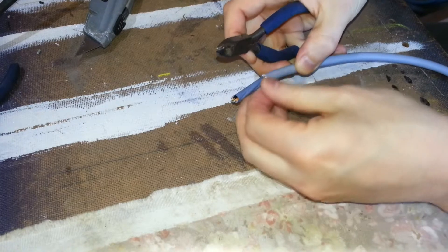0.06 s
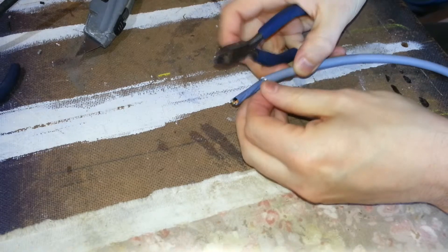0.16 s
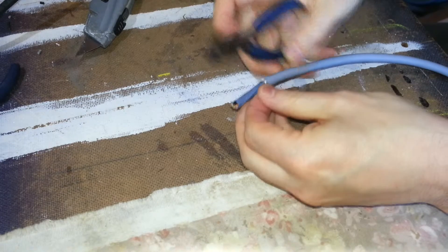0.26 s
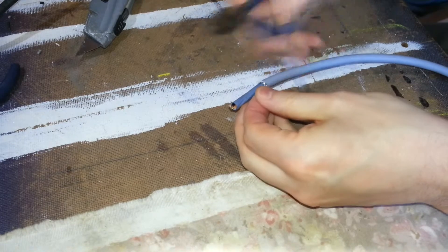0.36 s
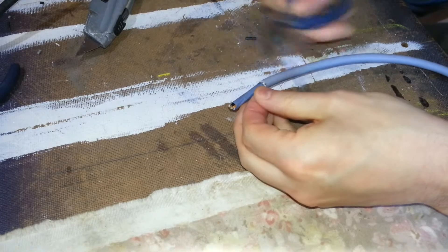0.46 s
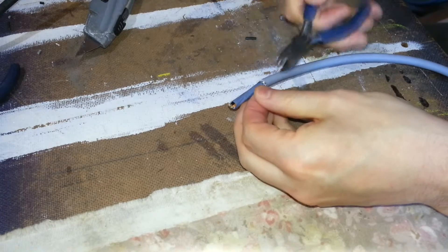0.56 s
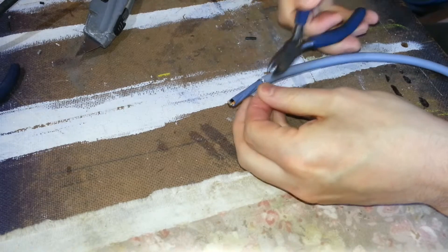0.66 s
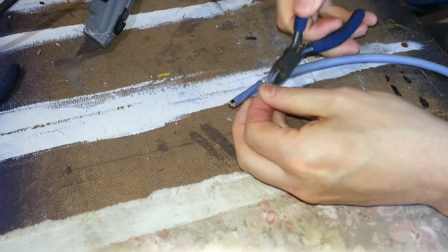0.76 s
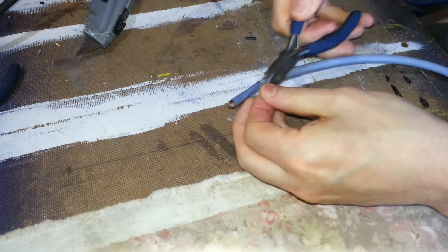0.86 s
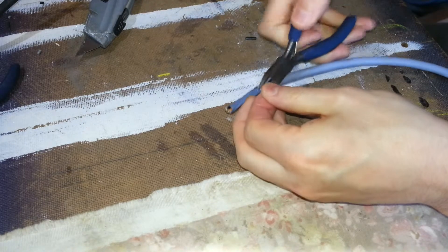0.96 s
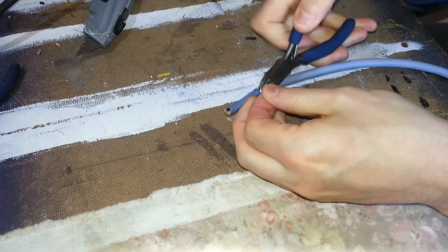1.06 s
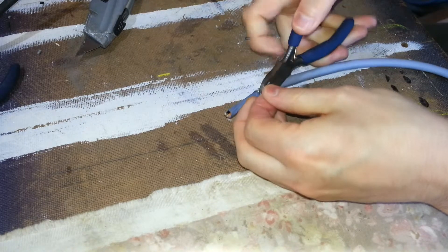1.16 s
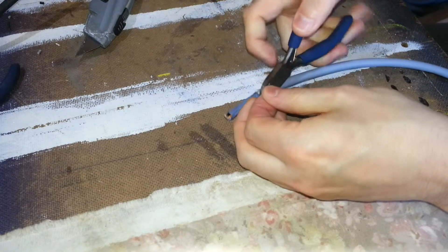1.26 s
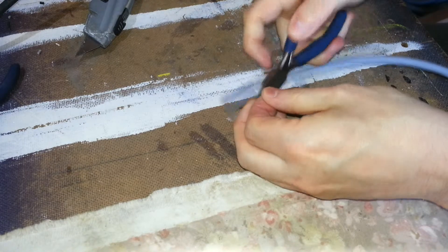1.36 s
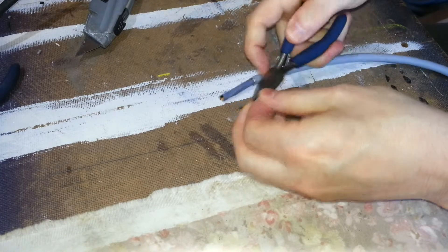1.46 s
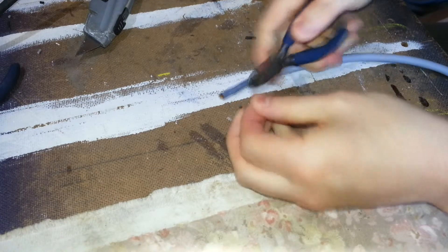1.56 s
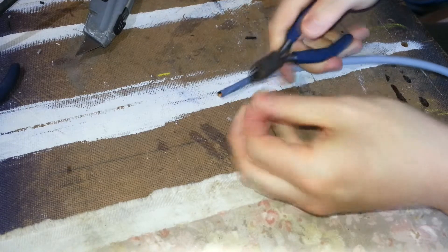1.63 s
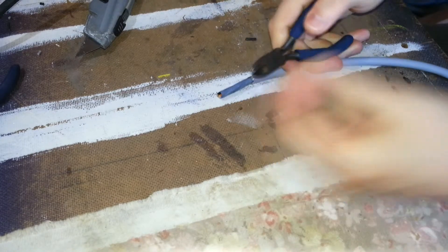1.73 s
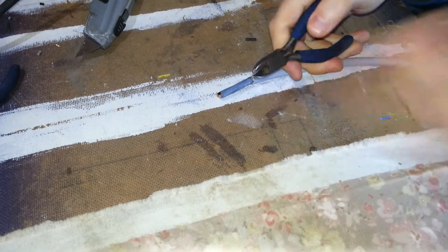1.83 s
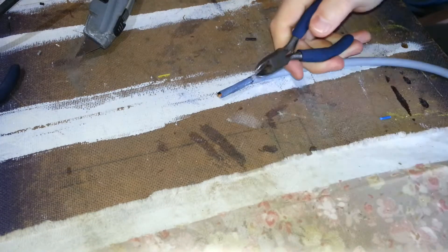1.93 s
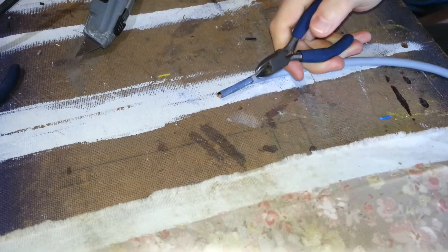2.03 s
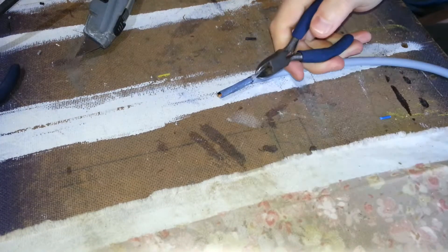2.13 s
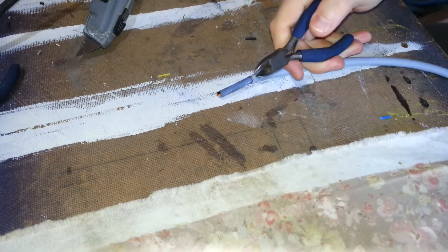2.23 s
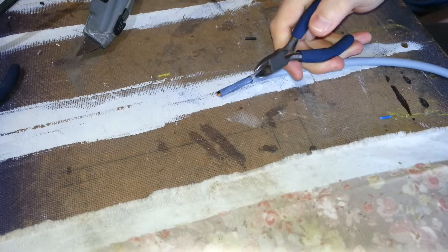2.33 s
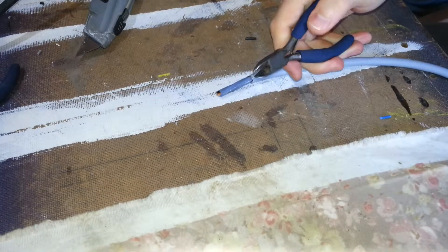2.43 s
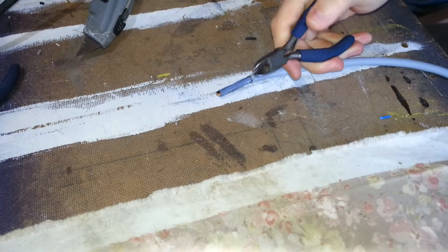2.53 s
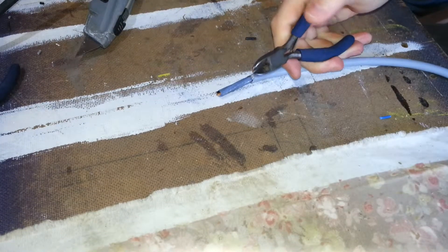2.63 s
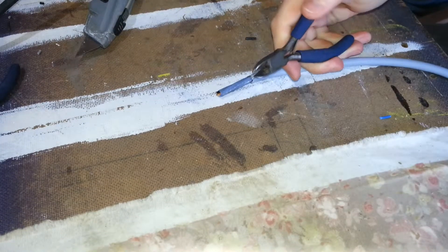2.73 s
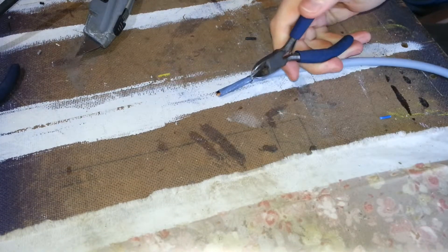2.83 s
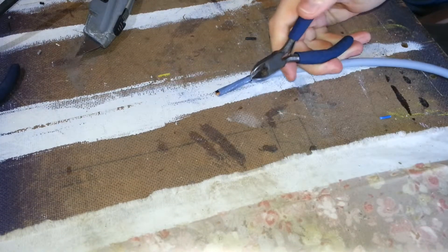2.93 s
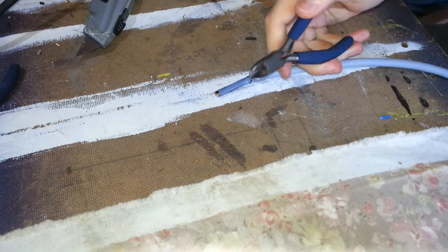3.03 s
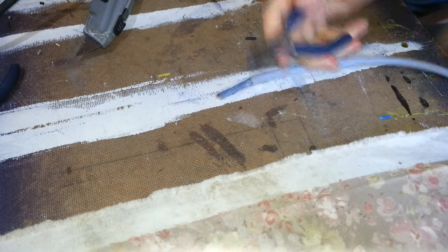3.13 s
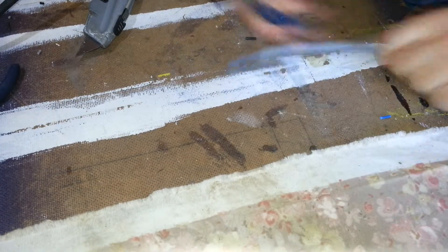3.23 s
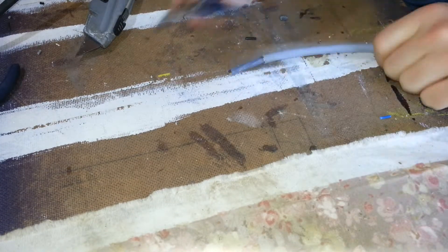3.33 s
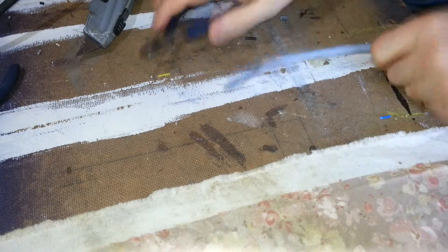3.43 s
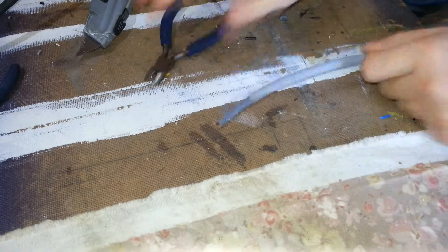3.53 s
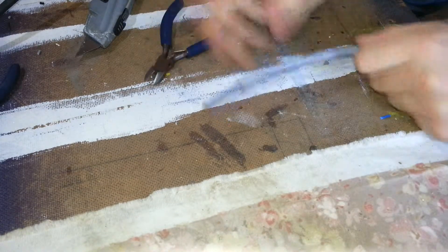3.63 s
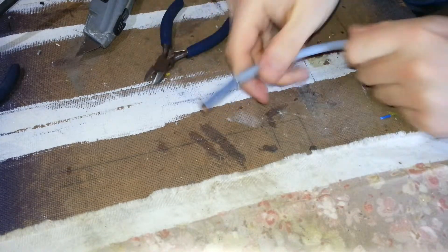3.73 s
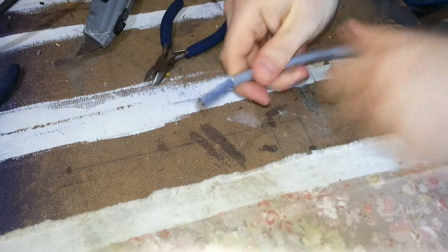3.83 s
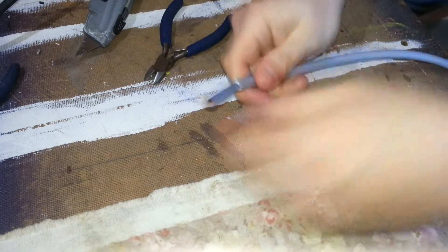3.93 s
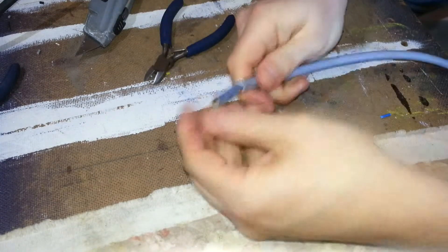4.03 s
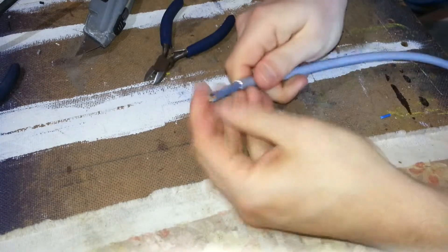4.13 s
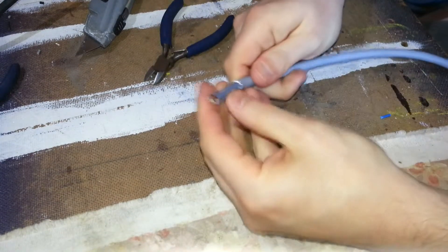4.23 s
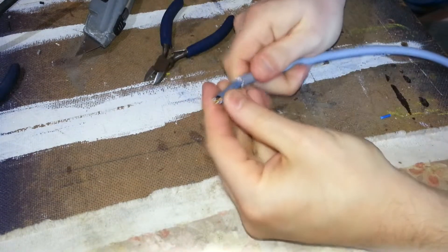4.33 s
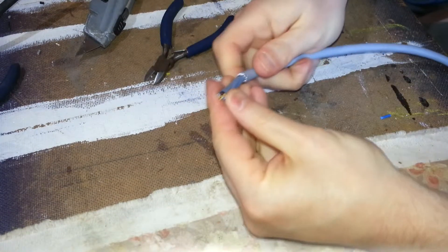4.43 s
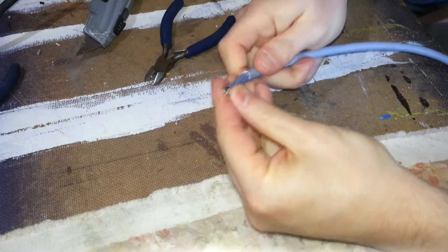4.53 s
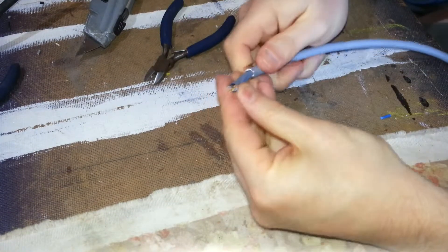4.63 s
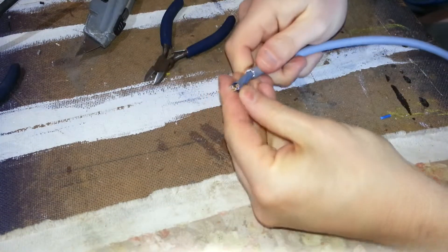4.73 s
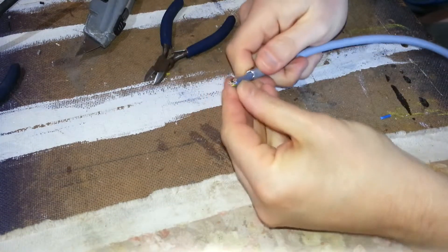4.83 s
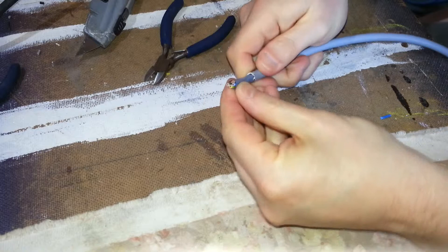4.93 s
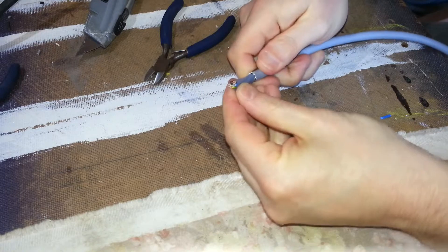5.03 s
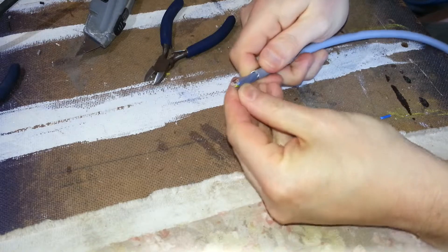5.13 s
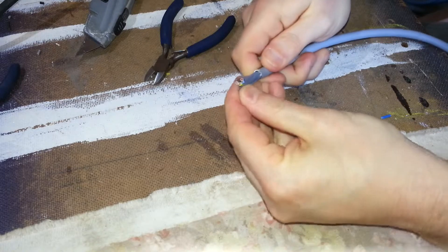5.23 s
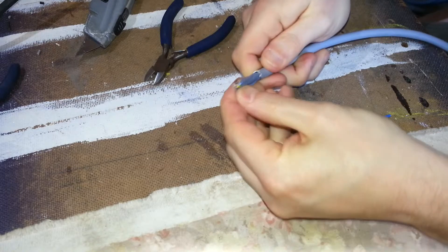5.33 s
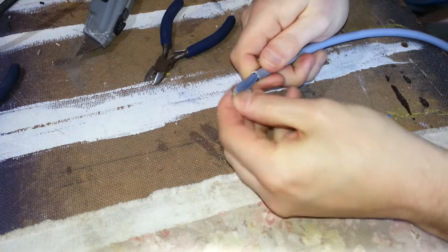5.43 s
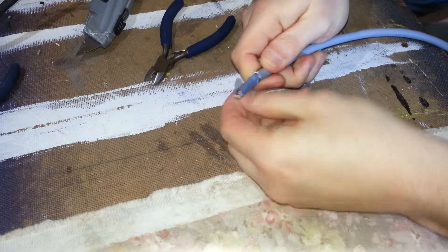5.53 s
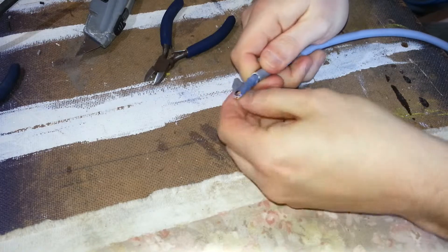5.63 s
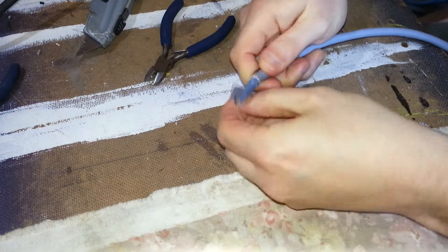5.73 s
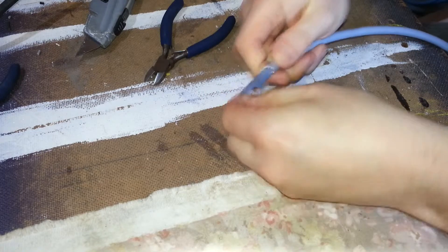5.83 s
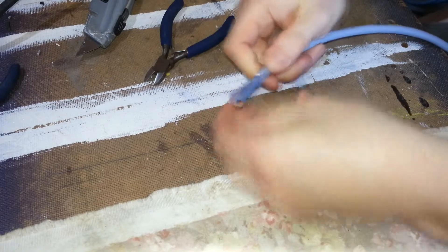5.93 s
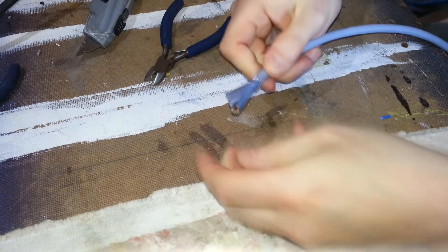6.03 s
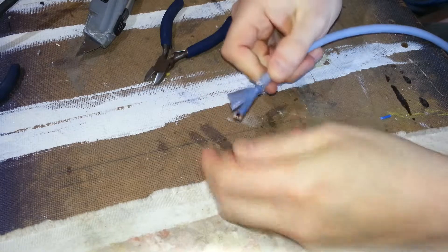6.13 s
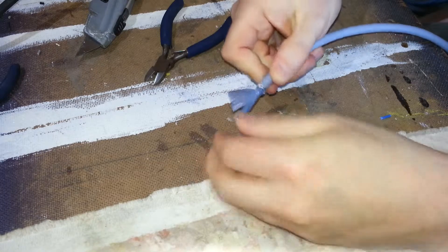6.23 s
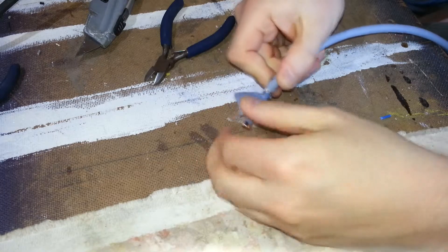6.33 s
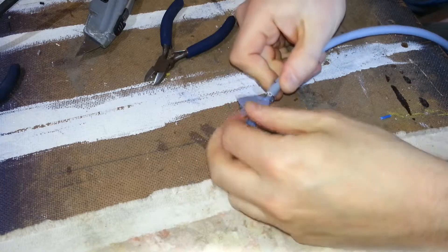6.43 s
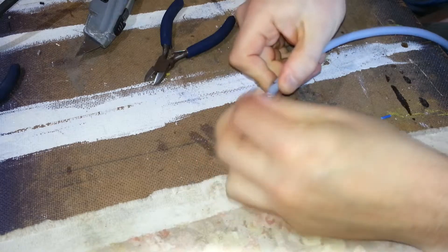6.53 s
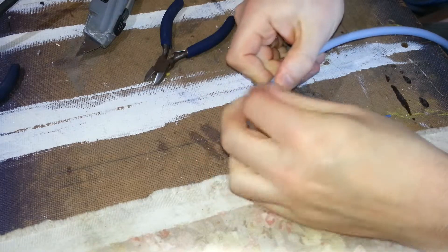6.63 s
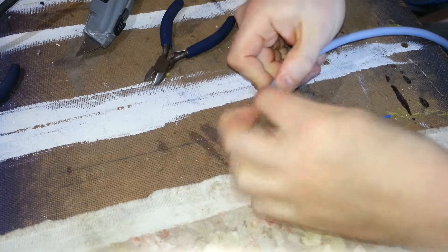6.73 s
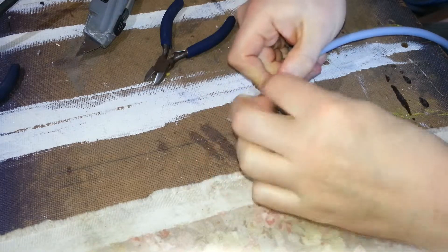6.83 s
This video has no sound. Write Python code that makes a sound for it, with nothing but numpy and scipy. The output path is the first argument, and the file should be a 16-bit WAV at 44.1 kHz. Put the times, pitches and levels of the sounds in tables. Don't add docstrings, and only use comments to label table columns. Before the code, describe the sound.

Side cutters knock softly, then clack hard onto a wooden workbench; fingers then pick and peel crackling foil from a cable end, close up in a small room.

```python
import sys
import numpy as np
from scipy import signal
from scipy.fft import rfft, irfft
from scipy.io import wavfile
from scipy.ndimage import uniform_filter1d

SR = 44100
rng = np.random.default_rng(int(sys.argv[2]) if len(sys.argv) > 2 else 0)


def int16_out(signal):
    q = np.round(np.clip(np.atleast_2d(signal).T, -1, 1) * 32767)
    wavfile.write(sys.argv[1], SR, q.astype(np.int16))


def ratio(d):
    e = np.asarray(d, float) / 20
    return 10 ** e


N = 302878

# frequency in Hz, level in dB, t60 in s.
BENCH_MODES = [(236, 1.5, 0.038), (309, -3, 0.2), (383.4, -6, 0.17), (434, 0, 0.056), (492.5, -8, 0.098),
               (537, -0.5, 0.096), (650, -0.5, 0.16), (805, -9, 0.25), (958, -11, .09), (1009, 5, 0.12),
               (1110, -9, 0.033), (1142, 6, 0.059), (1260, 11, 0.056), (1365, -5, 0.072),
               (1773, -5.5, 0.14), (1898, -4, 0.053), (2166, -2, 0.05)]
LEFT_LAG = 2


def unit(x):
    return x / np.sqrt(np.mean(x ** 2))


def shape(x, table):
    hz, db = np.transpose(table)
    f = np.fft.rfftfreq(x.shape[-1], 1 / SR) + 1
    return irfft(rfft(x) * ratio(np.interp(np.log(f), np.log(hz), db)), x.shape[-1])


def band(x, lo_hz, hi_hz):
    return signal.sosfilt(signal.butter(2, [lo_hz, min(hi_hz, .45 * SR)], "band", fs=SR, output="sos"), x)


def ring(hz, t60, t, phase=0):
    return np.sin(2 * np.pi * hz * t + phase) * 1000. ** (-t / t60)


def grains(per_s, spread_db):
    hit, size, sign = rng.random(N), rng.exponential(size=N), rng.standard_normal(N)
    return (hit < per_s / SR) * ratio(spread_db * np.minimum(size, 4.5)) * np.sign(sign)


def strokes(rows):
    t = np.arange(N) / SR
    return sum(ratio(db - 30 * np.maximum((s - t) / rise, (t - s) / fall)) for s, db, rise, fall in rows)


def add(out, s, x, db, pan_db=0, lag=0):
    i = int(s * SR)
    x = (x * ratio(db + np.array([[pan_db], [-pan_db]]) / 2))[:, :N - i - lag]
    out[0, i + lag:i + lag + x.shape[1]] += x[0]
    out[1, i:i + x.shape[1]] += x[1]


def knocks():
    # time in s, peak in dB, contact ring in Hz, ring rise in ms,
    # thud relative to the blow in dB.
    blows = [(.871, -43, 520, 1.6, 2.5), (1.3935, -14.5, 1690, 0.4, -11), (1.3962, -13.5, 1280, 1.76, -14),
             (1.393, -25, 309, 15, -24), (1.569, -45, 328, 5.7, -11), (1.592, -44, 318, 4, -7),
             (1.669, -46.5, 1110, 0.87, 5), (3.101, -43.5, 1370, 2.7, 3.5), (2.1265, -36.5, 370, 2.6, -23),
             (2.152, -35.5, 225, 3.3, -4), (3.118, -44, 1287, 0.82, 1), (3.2432, -24.5, 970, 2.6, -28),
             (3.244, -22.5, 472, 0.74, -13.5), (3.245, -24, 384, 5.3, -25), (3.305, -30, 910, 0.71, -5.5),
             (3.4325, -19.5, 1106, 1.3, -12), (3.5003, -4.5, 1050, 1.84, -10.5),
             (3.5172, 8, 1073, 0.8, -6.5), (3.5215, 0, 780, 0.95, -1.5), (3.5245, 3.5, 1300, 1.3, -22),
             (3.531, -16, 575, 4.7, -19), (3.6365, -14, 680, 1.5, -6.5), (3.644, -20, 1060, 1.9, 5),
             (3.572, -22, 396, 2.2, -18), (3.585, -32, 272, 1.7, -12), (5.532, -37.5, 565.7, 1.8, 9),
             (6.182, -42, 310, 0.816, 3), (6.199, -39, 566, 0.71, 0), (3.518, -12, 309, 12.3, -18),
             (3.518, -6.5, 248, 3.9, -14), (3.519, -10, 2397, 1.0, -8), (3.52, -19, 147, 22, -30),
             (1.393, -32.5, 359, 12, -24), (1.398, -31, 710, 7, -14), (1.3945, -32, 3000, 1.3, -16),
             (3.403, -32, 260, 2.4, -3), (3.446, -30, 1220, 1.6, -16), (3.245, -44, 224, 21, -30),
             (3.552, -29, 1114, 8.3, -11), (3.585, -19, 1110, 3.3, -17)]
    # frequency in Hz, level in dB per Hz.
    crack_colour = [(1300, -24.5), (2000, 4), (2900, 3.5), (4000, -7), (6000, -22.5), (9000, -30),
                    (16000, -50.5)]
    crack_1ms_db, crack_db_per_octave = -5.5, -8

    out, t = np.zeros((2, N)), np.arange(SR // 4) / SR
    hz, db, t60 = np.array(BENCH_MODES).T[:, :, None]
    mix = rng.standard_normal((len(blows), len(BENCH_MODES), 3))
    noise = rng.standard_normal((len(blows), 2, len(t)))
    ear = np.array([1, -1])[:, None]
    crack_decay = 1000. ** (-t / 0.032) + ratio(-11.0) * 1000. ** (-t / 0.14)
    for k, (s, peak_db, ring_hz, rise_ms, thud_db) in enumerate(blows):
        crack_db = thud_db + crack_1ms_db + crack_db_per_octave * np.log2(rise_ms)
        high_db = 0.43 * thud_db - 4.0 - 3 * np.abs(np.log2(hz / ring_hz))
        share_db = np.where(hz < 500, thud_db + 2.0, high_db)
        skew = ear[:, None] * mix[k, :, 2:] * np.minimum(hz / 1200, 1.3)
        detuned_hz = hz * (1 + .012 * mix[k, :, 1:2])
        modes = ratio(db + share_db + 2.5 * mix[k, :, :1]) * ring(detuned_hz, .5 * t60, t, skew)
        boards = ratio(-7.0) * modes.sum(1) * (1 - np.exp(-t / 0.0018))
        u = t / (rise_ms / 1000)
        contact = -np.sin(2 * np.pi * ring_hz * (t + ear * 7e-5)) * u * np.exp(.5 - u ** 2 / 2)
        crack = unit(shape(noise[k], crack_colour)) * crack_decay
        add(out, s, contact + boards + ratio(crack_db - 6.0) * crack, peak_db)
    return out


def drags():
    # peak in s, level in dB, rise in s, fall in s.
    pulls = [(1.406, -32.5, 0.008, 0.15), (1.6, -59.5, 0.16, 1), (3.104, -51.5, 0.017, 0.15),
             (3.245, -29, 0.0036, 0.062), (3.317, -33.5, 0.14, 0.097), (3.412, -30, 0.008, 0.11),
             (3.432, -36, 0.041, 0.066), (3.532, -11.5, 0.0039, 0.025), (3.55, -32.5, .02, 0.34),
             (3.642, -30, 0.031, 0.056), (5.86, -46.5, 0.25, 0.16)]
    grit_db, grit_power = -33.5, 0.51

    gain = strokes(pulls)
    t = np.arange(SR // 8) / SR
    body = sum(ratio(db) * ring(hz, 0.1 * t60, t) for hz, db, t60 in BENCH_MODES)
    slips = grains(2500, 0.81) + 0.14 * np.array([grains(2500, 2.6), grains(3800, 0.94)])
    grit = unit(band(slips, 1900, 3700)) + ratio(-2.5) * unit(band(slips, 4000, 12000))
    wood = unit(signal.fftconvolve(slips, body[None], axes=1)[:, :N])
    return band(ratio(-1.0) * (gain * wood + ratio(grit_db) * gain ** grit_power * grit), 220, 15000)


def touches():
    # time in s, peak in dB, tilt in dB per octave, t60 in s.
    contacts = [
        (1.166, -45, -2, .008),
        (1.394, -34.5, -10, .02),
        (1.4125, -37, -4, .012),
        (3.117, -48.5, -19, .01),
        (3.2445, -42, -2.5, .03),
        (3.414, -52.5, -4.5, .03),
        (3.5014, -20.5, -0.5, .007),
        (3.5178, -15, -3, .01),
        (3.525, -22.5, -5.5, .06),
    ]
    out, t = np.zeros((2, N)), np.arange(SR // 10) / SR
    noise = rng.standard_normal((len(contacts), 2, len(t)))
    for (s, db, tilt_db, t60), n in zip(contacts, noise):
        spit = unit(shape(n, [(2000, -29.5), (4000, 2), (16000, 2 * tilt_db)]))
        add(out, s, spit * 1000. ** (-t / t60), db)
    return out


def ticks():
    # time in s, peak in dB.
    picks = [(4.106, -44.5), (4.126, -43.5), (4.1606, -26), (4.199, -42.5), (4.342, -28.5), (4.384, -35),
             (4.4999, -37), (4.5238, -36.5), (4.7049, -34), (4.7364, -42), (4.775, -40), (4.7942, -33.5),
             (4.8795, -39.5), (4.9158, -43.5), (5.1376, -34), (5.2008, -31.5), (5.2292, -40), (5.2521, -43),
             (5.3428, -35), (5.411, -39.5), (5.4412, -39.5), (5.449, -33.5), (5.485, -36)]
    # time in s, peak in dB, centre in Hz.
    peel = [(5.5154, -15.5, 4680), (5.516, -28, 2200), (5.516, -10.5, 10530), (5.527, -11, 5030),
            (5.54, -5, 5180), (5.545, -11, 5230), (5.546, -22, 5000), (5.5498, -8, 5300),
            (5.5612, -13, 4620), (5.566, -21, 5500), (5.572, -28.5, 4490)]
    lift = [(5.645, -37, 5500), (5.671, -35.5, 7000), (5.674, -36.5, 8000), (5.6786, -39, 5000),
            (5.6909, -22.5, 5200), (5.7125, -24, 10900), (5.717, -30, 4150), (5.719, -31, 9000),
            (5.7288, -32.5, 4870), (5.731, -27.5, 5500), (5.738, -29, 4610), (5.7465, -28, 4600),
            (5.7587, -28, 9490), (5.7648, -25, 5500), (5.7717, -17.5, 8000), (5.7745, -31, 8800),
            (5.79, -19, 2920), (5.795, -19, 5600), (5.806, -26, 7030), (5.8158, -23, 4970),
            (5.819, -20, 5000), (5.813, -23, 2390), (5.7335, -26, 4500), (5.7405, -35, 5000),
            (5.7712, -20, 4500), (5.7582, -30, 4500)]
    pull = [(6.028, -39, 2950), (6.1826, -38.5, 3140), (6.219, -33, 2970), (6.2188, -33, 7700),
            (6.4562, -24.5, 1780), (6.4834, -25.5, 3330), (6.489, -32, 1750), (6.4915, -26, 1800),
            (6.4974, -21, 1880), (6.4986, -21, 3770), (6.5189, -16.5, 2710), (6.541, -24, 4000),
            (6.555, -17.5, 2370), (6.562, -28.5, 6000), (6.575, -24, 11000), (6.5841, -25, 3420),
            (6.5843, -18.5, 12000), (6.6014, -32, 4050), (6.616, -22, 4090), (6.6317, -19, 4050),
            (6.635, -17, 3650), (6.652, -27.5, 9250), (6.663, -21, 7500), (6.672, -23, 3370),
            (6.694, -25, 7970), (6.709, -29, 4000), (6.75, -35, 4270), (6.8133, -38, 5000),
            (6.835, -40, 8000), (6.797, -33, 10850), (6.493, -25.5, 9000), (6.525, -31, 3000),
            (6.539, -26, 4000), (6.5445, -40, 5000), (6.5555, -24, 10000), (6.62, -23, 4500),
            (6.575, -31, 3500), (6.675, -32.5, 4020)]
    sharp = [(1.3355, -41, 3600), (1.698, -47, 5000), (5.6828, -22, 8000), (5.7777, -16, 8000),
             (5.785, -15.5, 4300), (5.8092, -11, 3600), (5.8094, -16, 8000), (6.5305, -14, 3600),
             (6.6492, -16, 3700), (6.6496, -19, 9500), (6.793, -25, 7500), (6.794, -31, 3200),
             (6.83, -24, 5000), (6.8303, -28, 11000)]
    # top relative to the body in dB, left minus right in dB,
    # ring width in octaves, rattle in dB.
    kinds = [
        (-4.5, 2, 0.58, -17.5),
        (-17, 2, 0.68, -13.5),
        (-9.5, 1, 1.2, -11.5),
        (-10, 3.5, 1.03, -10.5),
        (-10.5, 0.5, 1.3, -10.5),
    ]

    out, t = np.zeros((2, N)), np.arange(SR // 40) / SR
    pick_rows = [(s, db, 4970) for s, db in picks]
    for rows, (top_db, pan_db, width, rattle_db) in zip((pick_rows, peel, lift, pull, sharp), kinds):
        noise = rng.standard_normal((len(rows), len(t) + 2))
        decay = 1000. ** (-t / 0.00127) + ratio(rattle_db) * 1000. ** (-t / 0.025)
        for k, (s, peak_db, hz) in enumerate(rows):
            snap = 1.76 * (t == 0) + 0.55 * noise[k, 2:] * decay
            body = band(snap, hz / 2 ** (0.44 * width), hz * 2 ** (0.59 * width))
            top = band(snap, 5600, 13900)
            top_gain = ratio(top_db + 8.5 + 2.0 * noise[k, 0])
            click = body / np.abs(body).max() + top_gain * top / np.abs(top).max()
            add(out, s + 0.00054, click, peak_db + 0.09, pan_db + 2.7 * noise[k, 1], lag=LEFT_LAG - k % 2)
    return out


def crinkle():
    # peak in s, level in dB, rise in s, fall in s, brightness in dB.
    rubs = [(.44, -52.5, 0.12, 0.096, -4), (.958, -57, 0.11, 0.047, -2), (1.16, -66, 0.058, 0.069, 0),
            (1.336, -54, 0.0055, 0.022, -6), (1.797, -50.5, 0.4, 0.14, -9), (4.158, -47, 0.044, 0.071, 7.5),
            (4.345, -55, 0.044, 1.1, -7), (4.708, -51, 0.02, 0.058, -17.5),
            (4.797, -49.5, 0.018, 0.076, -1), (4.83, -63.5, .05, 0.66, 5), (5.15, -58, 0.031, 0.26, 1),
            (5.49, -53.5, 0.41, 0.059, 7), (5.517, -31, 0.0042, 0.11, 0.5), (5.543, -26, 0.035, 0.068, 3.5),
            (5.684, -55.5, 0.02, 0.36, 18), (5.813, -29.5, 0.059, 0.051, -1.5),
            (5.845, -72, 0.035, 0.12, -1), (5.97, -54, .2, .7, -28), (6.35, -58, 0.44, .5, -22),
            (6.456, -46.5, 0.017, 0.17, -17), (6.536, -45.5, 0.075, 0.21, -4),
            (6.62, -54, 0.038, .05, -7.5), (6.635, -41, 0.0086, 0.033, -6), (6.65, -34, 0.15, 0.17, 2),
            (6.651, -31.5, .005, .016, 0), (6.755, -71, 0.02, .05, -14), (5.735, -51, 0.067, 0.064, -1),
            (5.795, -26.5, 0.027, 0.036, -10), (6.794, -41.5, 0.0037, 0.094, 5.5),
            (6.829, -57, .015, 0.073, 14)]
    # frequency in Hz, level in dB per Hz.
    foil_colour = [(1180, -92), (1900, -21), (2850, 0.5), (4500, 4), (6200, -6.5), (9000, -5), (11700, -14),
                   (19800, -120)]
    body_db, body_power = -21.5, 0.69

    gain = strokes([row[:4] for row in rubs])
    bright = strokes([(s, db + top_db, rise, fall) for s, db, rise, fall, top_db in rubs])
    both, own = grains(5000, 2.5), np.array([grains(5000, 2.5), grains(5000, 2.5)])
    x = np.array([np.roll(both, LEFT_LAG), both]) + 1.3 * own
    foil = unit(shape(x, foil_colour))
    body = ratio(body_db) * unit(band(x, 883, 2650))
    top = unit(band(x, 6900, 16350))
    stutter = unit(uniform_filter1d(rng.standard_normal(N), int(0.00524 * SR)))
    return ratio(-3.0 + 2.0 * stutter) * (gain * foil + gain ** body_power * body + bright * top)


def slides():
    # start in s, end in s, level in dB.
    moves = [
        (1.76, 1.84, -66),
        (6.179, 6.303, -60.5),
        (6.283, 6.47, -60.5),
    ]
    # frequency in Hz, width in Hz, level in dB.
    weave = [(1290, 420, -6), (1690, 248, -5), (3160, 280, 1.5), (3780, 1310, 0), (4500, 390, -10)]

    rub, t = grains(9700, 0.96), np.arange(N) / SR
    gain = sum(ratio(db) * np.clip(np.minimum(t - start, end - t) / 0.022, 0, 1) for start, end, db in moves)
    flutter = unit(uniform_filter1d(rng.standard_normal(N), int(0.011 * SR)))
    hiss = unit(sum(ratio(db) * unit(band(rub, hz - w / 2, hz + w / 2)) for hz, w, db in weave))
    return gain * ratio(4.5 + 1.17 * flutter) * hiss


def squeaks():
    # start in s, length in s, first Hz, last Hz, level in dB.
    whistles = [
        (1.70, 0.15, 2660, 2980, -68),
        (1.849, .09, 2950, 3000, -66),
        (1.925, .035, 4300, 4440, -60),
        (1.928, 0.05, 3200, 3490, -53),
        (1.957, 0.05, 3390, 3440, -55),
        (2.03, .05, 3200, 3830, -62),
    ]
    out, u_s = np.zeros((2, N)), np.arange(SR // 3) / SR
    wobble = unit(uniform_filter1d(rng.standard_normal((len(whistles), 2, SR // 3)), int(0.0023 * SR)))
    for (s, length, first_hz, last_hz, db), (pitch, level) in zip(whistles, wobble):
        u = np.minimum(u_s / length, 1)
        hz = (first_hz + (last_hz - first_hz) * u) * (1 + .028 * pitch)
        phase = 2 * np.pi * np.cumsum(hz) / SR
        tone = np.sin(phase) + ratio(-16) * np.sin(1.31 * phase)
        add(out, s, np.sin(np.pi * u) * (1 + .8 * level) * tone, db)
    return out


def bumps():
    bump_times = [
        2.125,
        3.243,
        3.518,
        5.83,
    ]
    # level in dB, push length in s, level of a brief one-sided low pulse in dB.
    pushes = [
        (-35, 0.072, -78),
        (-54.5, .03, -71),
        (-21.5, 0.013, -28),
        (-59, 0.17, -79.5),
    ]
    # frequency in Hz, level in dB, t60 in s.
    frame_modes = [(64.6, -16, 0.12), (94.1, -5.5, .2), (136.5, -9, 0.2), (167, -5, 0.21), (209, -1, 0.2),
                   (227, 0, 0.3), (250, 0, 0.32), (320, -2, 0.25), (338, -0.7, 0.1), (439.5, -7.5, 0.059),
                   (510.4, -7.5, 0.064), (620, -10, .1)]

    out, t = np.zeros((2, N)), np.arange(SR // 2) / SR
    frame = band(sum(ratio(db) * ring(hz, 0.68 * t60, t) for hz, db, t60 in frame_modes), 74, 900)
    noise = rng.standard_normal((len(pushes), len(t)))
    for (s, bump_db, push_s, jolt_db), n in zip(np.c_[bump_times, pushes], noise):
        thud = signal.fftconvolve(n * np.exp(-(t / push_s) ** 2), frame)[:len(t)]
        add(out, s, thud / np.abs(thud).max(), bump_db)
        add(out, s, t / 0.003 * np.exp(1 - t / 0.0032), jolt_db, pan_db=0.15)
    return out


def room(dry):
    # frequency in Hz, t60 in s.
    decay_times = [(100, 0.5), (500, 0.21), (1500, 0.3), (4000, 0.29), (8000, 0.28), (14000, 0.22)]
    level_db, gap_s = -6.5, 0.0041

    t = np.arange(int(.7 * SR)) / SR
    hz, t60 = np.transpose(decay_times)
    echo = 0
    for f in 90 * 2 ** np.arange(8.):
        decay = 1000. ** (-t / np.interp(np.log(f), np.log(hz), t60))
        common, own = rng.standard_normal(len(t)), rng.standard_normal((2, len(t)))
        alike = min(600 / f, 5.)
        octave = band(common * alike + own, f / np.sqrt(2), f * np.sqrt(2))
        echo = echo + octave / np.hypot(alike, 1) * decay
    echo = echo * (t > gap_s) * (1 - np.exp(-t / 0.0033))
    echo = echo / np.sqrt((echo ** 2).sum(1, keepdims=True))
    return ratio(level_db) * signal.fftconvolve(dry.mean(0)[None], echo, axes=1)[:, :N]


def floor():
    # frequency in Hz, level in dB per Hz.
    floor_colour = [(15, -46.5), (25, -33), (107, -4), (247, -6.5), (282, -9), (332, -7.5), (369, -10),
                    (616, -13.5), (668, -13.5), (2020, -20), (4060, -21.5), (5460, -26.5), (13300, -23),
                    (14400, -22.5), (15600, -68.5)]
    # frequency in Hz, likeness from 0 to 1.
    likeness = [(60, 0.23), (300, 0.19), (1000, 0.057), (4000, 0.052), (12000, 0.078)]
    # time in s, level in dB.
    swell = [
        (0.0, -52.5),
        (0.71, -54.5),
        (1.68, -51.5),
        (2.91, -53.5),
        (3.19, -56),
        (3.48, -46),
        (3.58, -48),
        (3.73, -54),
        (3.881, -52.5),
        (6.87, -51),
    ]
    hz, like = np.transpose(likeness)
    like = np.clip(like, 0, .999)
    mid, side = (shape(shape(rng.standard_normal(N), floor_colour), np.c_[hz, 10 * np.log10(1 + k * like)])
                 for k in (1, -1))
    x = unit(np.array([mid + side, mid - side])) * ratio(-57.5)
    s, db = np.transpose(swell)
    low = signal.sosfilt(signal.butter(1, 2500, fs=SR, output="sos"), x)
    return x + low * (ratio(np.interp(np.arange(N) / SR, s, db - np.min(db))) - 1)


def scene():
    struck = knocks() + drags() + touches()
    bench = signal.sosfilt(signal.butter(2, 150, "high", fs=SR, output="sos"), struck) + bumps()
    hands = ticks() + crinkle() + slides()
    return bench + hands + room(bench + ratio(-3.0) * hands) + squeaks() + floor()


def starve(x):
    low_hz, top_hz, depth_db = 170.7, 10510, 21
    bass_loud_db, treble_loud_db, bass_quiet_db = -33, -46, -55

    def split(hz, kind):
        return signal.sosfiltfilt(signal.butter(4, hz, kind, fs=SR, output="sos"), x)

    def over(v, db):
        level_db = 10 * np.log10(uniform_filter1d(v.mean(0) ** 2, SR // 25) + 1e-12)
        return np.clip((level_db - db) / 8, 0, 1)

    boom = over(split(2000, "low"), bass_loud_db)
    crackle = over(split(2800, "high"), treble_loud_db)
    thin_top = np.roll(boom, SR // 30) * boom
    thin_bass = np.roll(crackle * (1 - over(split(900, "low"), bass_quiet_db)), SR // 28)
    lost_top = split(top_hz, "high") * (1 - ratio(-depth_db * thin_top))
    lost_bass = split(low_hz, "low") * (1 - ratio(-depth_db * thin_bass))
    return x - lost_top - lost_bass


def roll_off(x):
    return signal.sosfilt(signal.butter(12, 15750, fs=SR, output="sos"), x)


def record(dry):
    heard = signal.sosfilt(signal.ellip(6, .5, 30, 14450, fs=SR, output="sos"), dry)
    finished = np.clip(starve(heard), -1, 1)
    return roll_off(finished)


dry = scene()
out = record(dry)
int16_out(out)
```